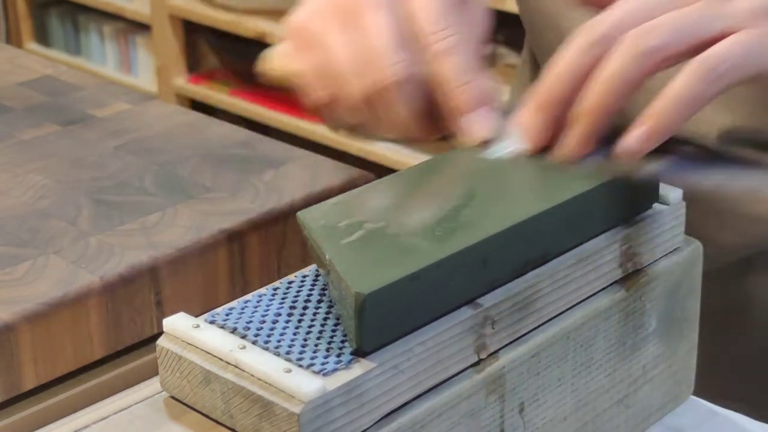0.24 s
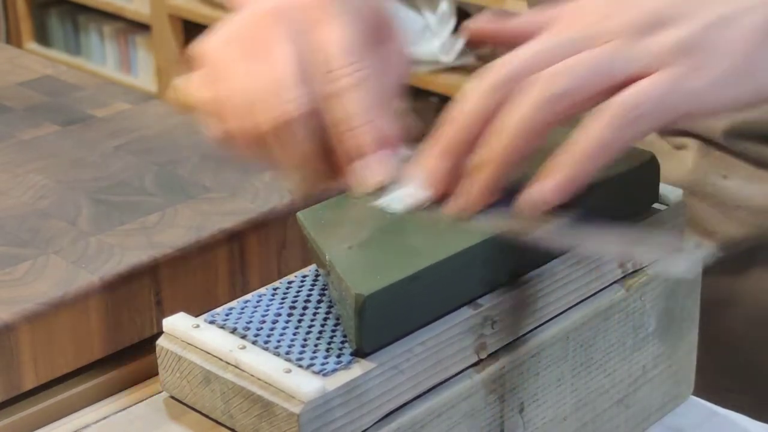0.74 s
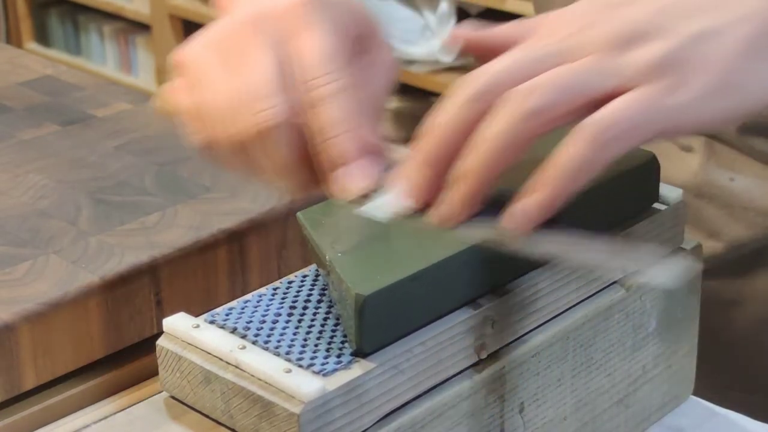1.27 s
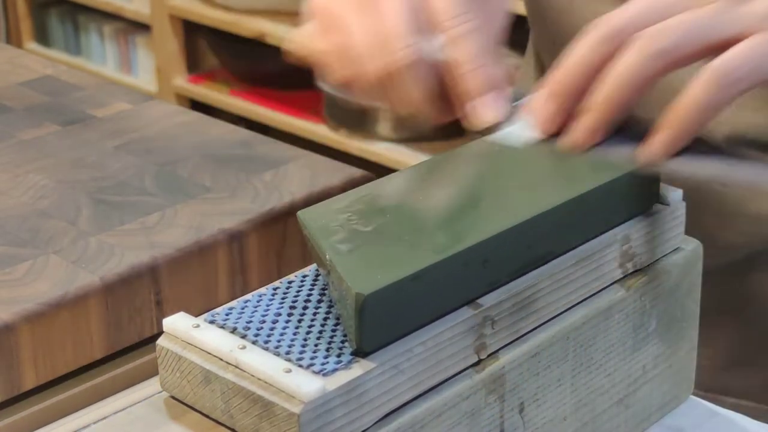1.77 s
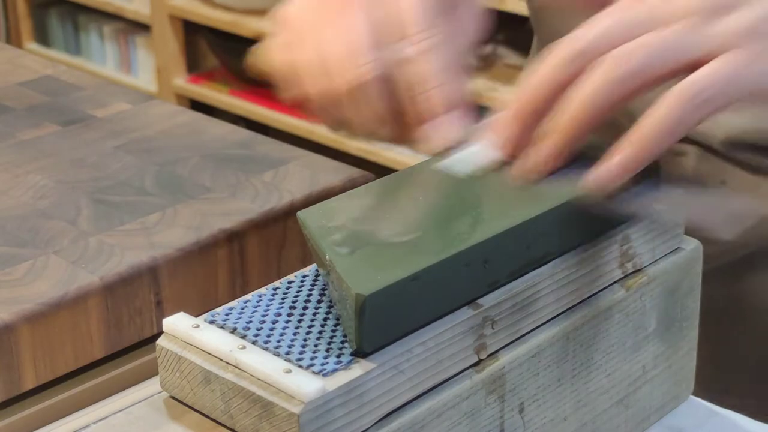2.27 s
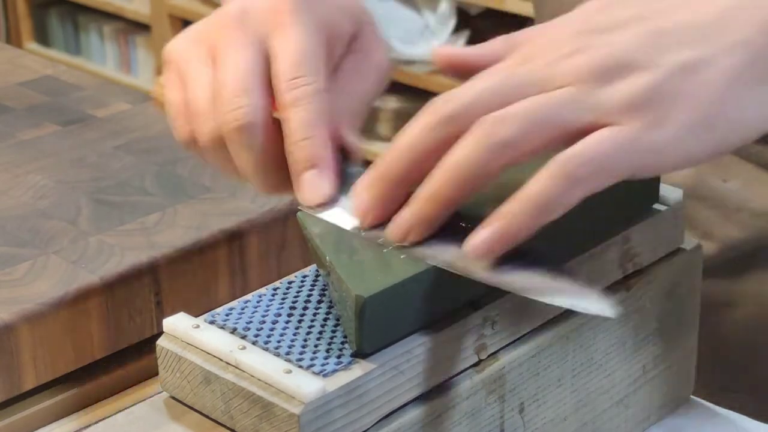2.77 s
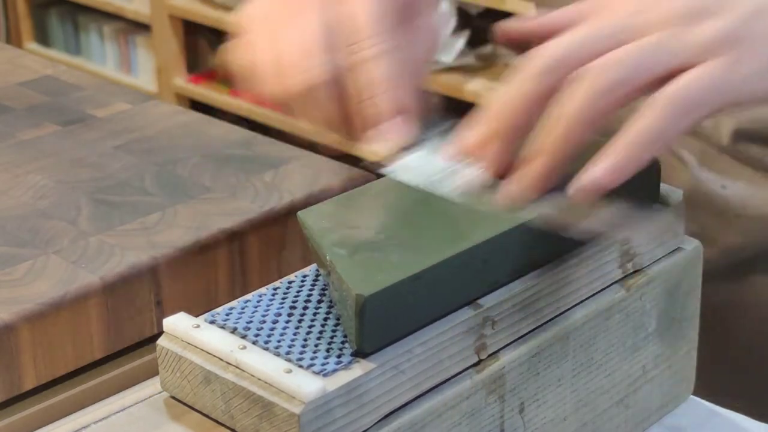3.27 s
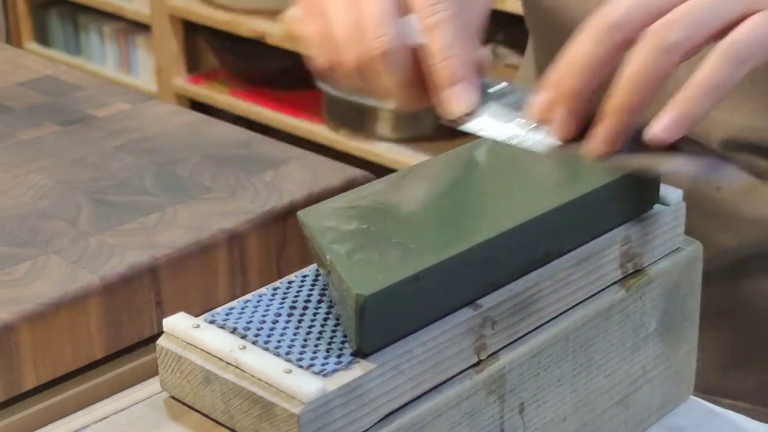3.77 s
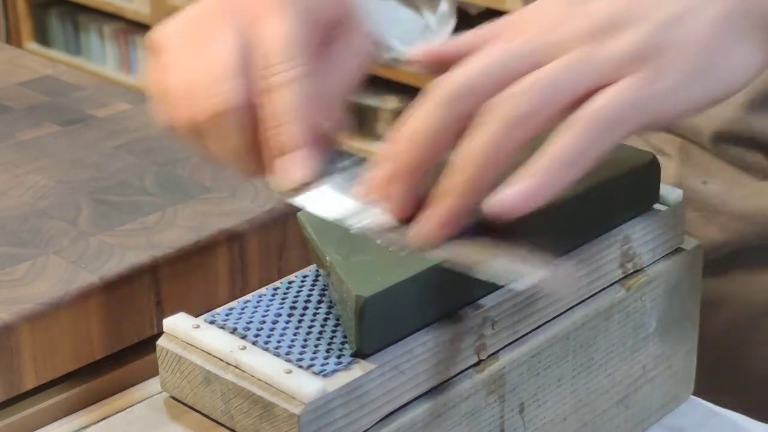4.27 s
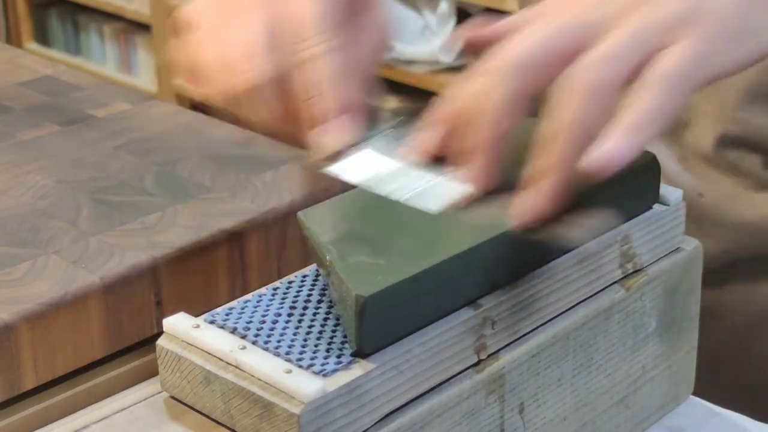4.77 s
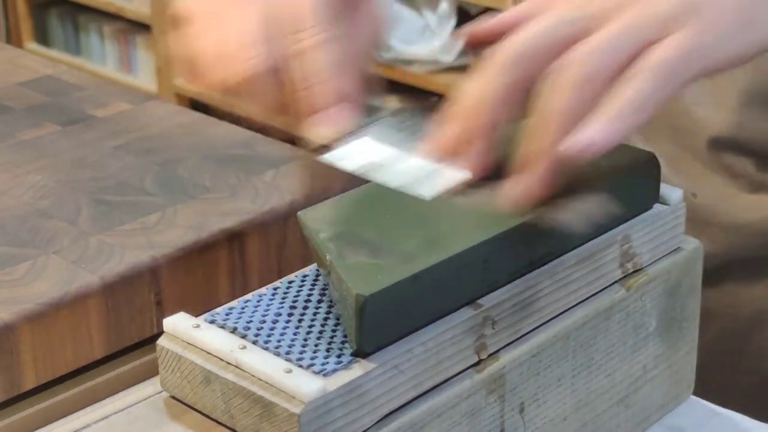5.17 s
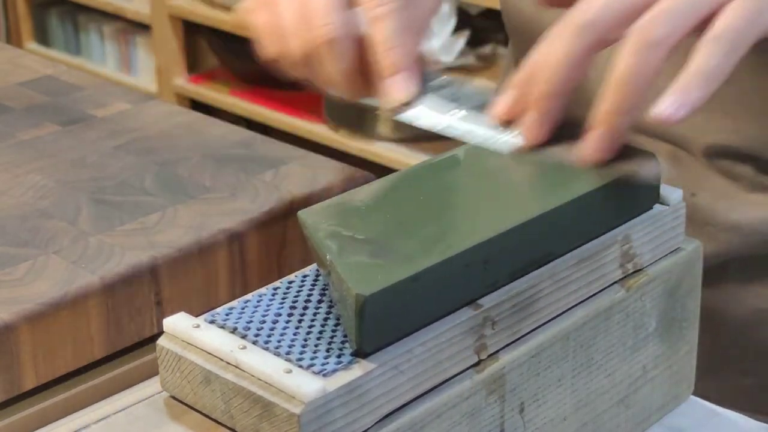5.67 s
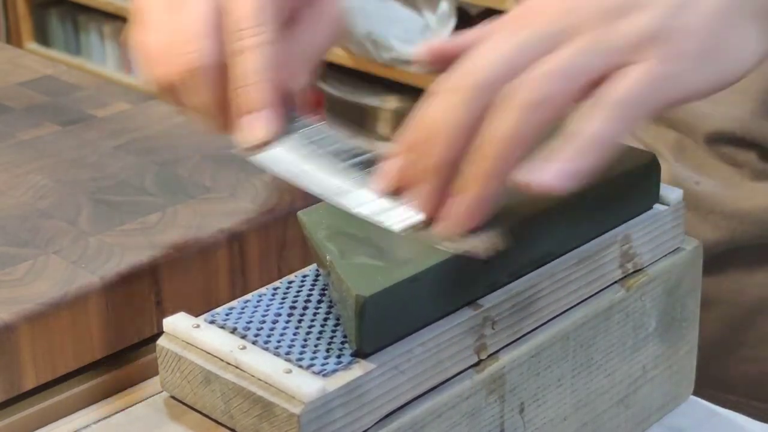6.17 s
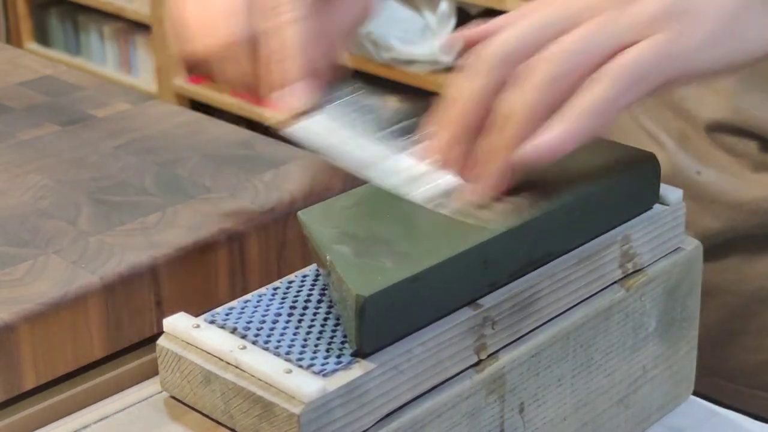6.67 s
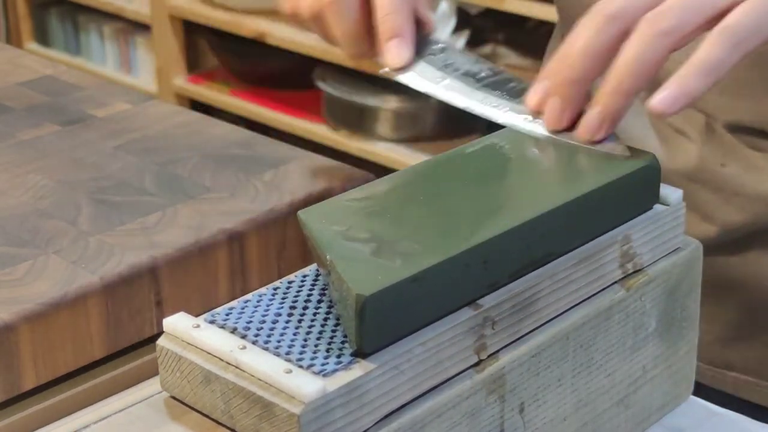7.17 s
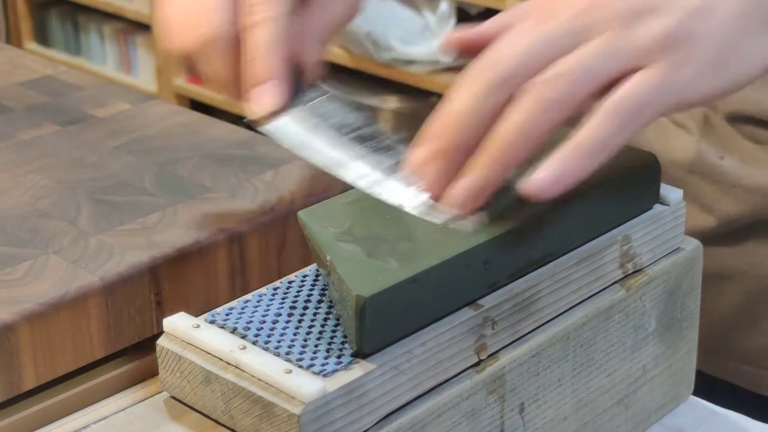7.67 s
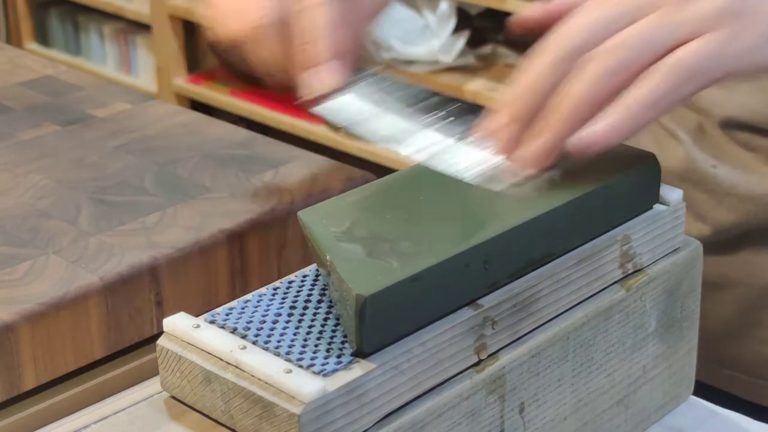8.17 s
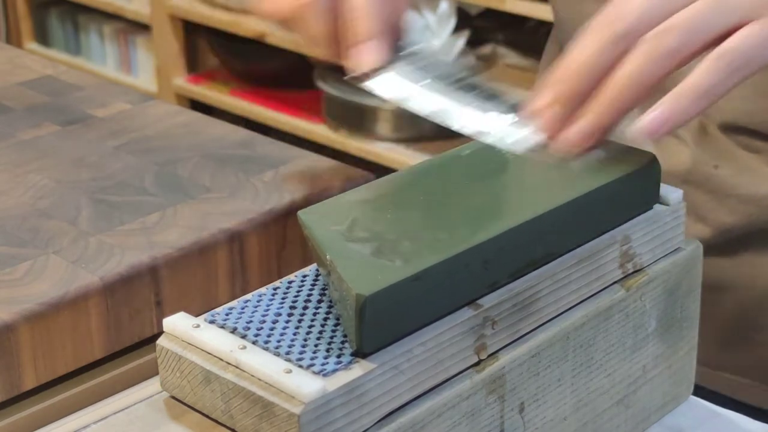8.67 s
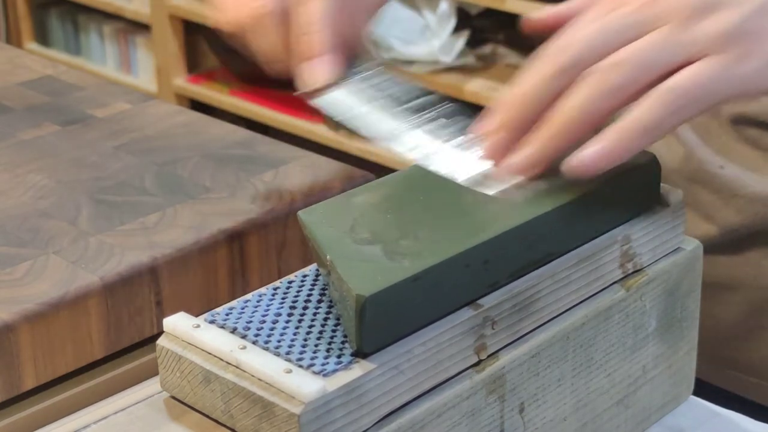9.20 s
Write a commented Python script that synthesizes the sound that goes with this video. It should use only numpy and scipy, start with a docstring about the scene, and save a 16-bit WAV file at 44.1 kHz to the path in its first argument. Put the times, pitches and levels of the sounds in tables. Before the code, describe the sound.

Close, rapid knife sharpening: gritty push and pull scrapes with a ringing steel tone, swelling early and thinning softer toward the end.

```python
"""A steel knife is pushed and pulled over a wet whetstone, close by in a quiet room.
The rasp is noise: grit scratches the edge, and each stroke shapes how loud it is. The scratches ring
the blade's resonances, which sway with each stroke and change as the fingers move from heel to tip.
Ticks mark where the edge breaks loose, and a few resonances sing out for a moment. Filtered noise gives
the faint rumble and thumps of the wooden stand, the room's short answer and its quiet background."""
import sys
import numpy as np
from scipy import signal
from scipy.fft import rfft, irfft, next_fast_len
from scipy.io import wavfile
from scipy.ndimage import uniform_filter1d, map_coordinates

SR = 44100
rng = np.random.default_rng(int(sys.argv[2]) if len(sys.argv) > 2 else 0)


def store_wav(level_fs):
    """Save 16-bit WAV to argv[1]."""
    pcm = np.round(np.clip(np.atleast_2d(level_fs), -1, 1) * 32767)
    wavfile.write(sys.argv[1], SR, pcm.T.astype(np.int16))


N = 416304
TIME = np.arange(N) / SR


def amp(db):
    """Turn decibels into a gain."""
    return 10 ** (np.asarray(db) / 20)


def unit(x):
    """Scale to an rms of 1."""
    return x / np.sqrt(np.mean(x ** 2) + 1e-20)


def ease(share):
    """Rise from 0 to 1 along a quarter of a sine, quick at first and gentle at the end."""
    return np.sin(np.pi / 2 * np.clip(share, 0, 1))


def along(points, hz):
    """Read a list of (Hz, value) points, with frequency on a log axis."""
    f, v = np.transpose(points)
    return np.interp(np.log(hz + 1), np.log(f + 1), v)


def wobble(rate, t):
    """A smooth random curve at times t, with rate random points a second."""
    points = rng.standard_normal(int(t[-1] * rate) + 4)
    return map_coordinates(points, [t * rate], mode="nearest")


def patches(shape):
    """A random field of rms 1, smooth over about 130 Hz and 70 ms."""
    field = uniform_filter1d(rng.standard_normal(shape), size=3, axis=-2)
    return unit(uniform_filter1d(field, size=12, axis=-1))


def filtered(x, response):
    """Filter x by a gain that depends on frequency."""
    m = next_fast_len(N + SR // 2)
    spectrum = rfft(x, m) * response(np.fft.rfftfreq(m, 1 / SR))
    return irfft(spectrum, m)[..., :N]


def pair(alike):
    """White noise at two microphone ports; alike is the share of its power that both receive."""
    alike = np.clip(alike, 0, 1)
    shared = np.sqrt(alike) * rng.standard_normal(N)
    return shared + np.sqrt(1 - alike) * rng.standard_normal((2, N))


def noise(spectrum, alike):
    """Coloured stereo noise of rms 1."""
    return unit(filtered(pair(alike), lambda hz: amp(along(spectrum, hz))))


def causal(db):
    """Responses that ring only after a blow, from gains laid out as (port, frequency, time)."""
    cepstrum = irfft(np.log(amp(db)), axis=1)
    half = cepstrum.shape[1] // 2
    # folding the second half onto the first gives the minimum-phase response
    cepstrum[:, 1:half] *= 2
    cepstrum[:, half + 1:] = 0
    return np.exp(rfft(cepstrum, axis=1))


# The strokes, push and pull in turn, a push first. Each row: start in seconds, relative level in dB,
# lean in dB (how much harder it ends than it begins), bite as a share of the stroke's level.
STROKES = [(-0.125, -41.5, 7.5, 0.0), (0.072, -38, -9.0, 0.17), (0.289, -41.5, 6.5, 0.031),
           (0.495, -39, 0.5, 0.0), (0.697, -41.5, 10.5, 0.18), (0.915, -39.5, -12, 0.0),
           (1.118, -41.5, 15, 0.72), (1.324, -34, 9, 0.11), (1.522, -33.5, 7.5, 0.67),
           (1.713, -29.5, -9.5, 0.0), (1.91, -35, 13.0, 0.28), (2.105, -31.5, -12.0, 0.28),
           (2.294, -34.5, 16.5, 0.28), (2.487, -30.5, -5.5, 0.0), (2.681, -35, 21, 0.61),
           (2.883, -31, 2, 0.41), (3.086, -33.5, -1.5, 0.41), (3.27, -31, 7, 0.24),
           (3.468, -35.5, -5.5, 0.19), (3.653, -30.5, 6, 0.14), (3.843, -34.5, -11, 0.0),
           (4.031, -31, 3.5, 0.0), (4.215, -34.5, 1.5, 0.16), (4.411, -31.5, -4.5, 0.27),
           (4.602, -34.5, -6, 0.17), (4.787, -31.5, -1.5, 0.0), (4.986, -37.0, -6, 0.11),
           (5.172, -32, 2.5, 0.11), (5.365, -37.0, 2, 0.3), (5.55, -32.5, -4.5, 0.0),
           (5.725, -38.5, 17.5, 0.0), (5.914, -33.5, 1, 0.0), (6.111, -38.0, 5, 0.77),
           (6.305, -34.0, 0, 0.0), (6.498, -39, -3, 0.36), (6.69, -31, 6.5, 0.1), (6.877, -37, 3.5, 0.29),
           (7.066, -32.0, -1.5, 0.073), (7.252, -39.5, -7, 0.0), (7.436, -36.5, -1, 0.81),
           (7.619, -42.0, -2.5, 0.28), (7.802, -34.5, 6.0, 0.43), (7.973, -41, 2.5, 0.0),
           (8.163, -36, 6, 0.16), (8.358, -41.5, -13, 0.5), (8.537, -35.0, 6.5, 0.0),
           (8.706, -43, -1, 0.048), (8.893, -41, 2.5, 0.6), (9.063, -44.5, -4.5, 0.54),
           (9.226, -39, 15, 0.23), (9.393, -42, 3, 0.21)]


def stroke_count(t):
    """Strokes done by time t, with fractions; the last one lasts as long as the one before."""
    starts = [row[0] for row in STROKES]
    turns = starts + [2 * starts[-1] - starts[-2]]
    return np.interp(t, turns, np.arange(len(turns)))


PUSH_RISE, PUSH_FALL = 0.55, 0.31  # shares of a push spent speeding up and slowing down
PULL_RISE, PULL_FALL = 0.52, 0.86  # the same for a pull
RISE_POWER, FALL_POWER = 0.62, 0.91  # how steeply the rasp follows each of the two
TURN_DB = -17  # rasp left at the turn, against the strokes around it
# after a turn the edge may stick, then break loose with a bite that fades
STICK_S, BITE_ATTACK_S, BITE_LIFE_S = 0.015, 0.002, 0.024
STUCK_DB = -4  # the rasp is held back while the edge still sticks


def effort():
    """Speed times pressure: each stroke speeds up, leans on its start or end, and slows into the turn."""
    start, level_db, lean_db, bite = np.transpose(STROKES)
    done = stroke_count(TIME)
    k = np.minimum(done.astype(int), len(STROKES) - 1)  # which stroke
    u = done - k  # how far through it, 0 to 1
    pull = k % 2 == 1
    rise = ease(u / np.where(pull, PULL_RISE, PUSH_RISE)) ** RISE_POWER
    fall = ease((1 - u) / np.where(pull, PULL_FALL, PUSH_FALL)) ** FALL_POWER
    slide = rise * fall * amp(lean_db[k] * (u - .5))

    loose = TIME - start[k] - STICK_S  # seconds since the edge broke loose
    free = ease(loose / BITE_ATTACK_S + .5)
    slide = slide * amp(STUCK_DB * (1 - free))
    breakaway = bite[k] * free * np.exp(-np.abs(loose) / BITE_LIFE_S)
    # a stroke that ends harder bites less
    breakaway = breakaway * np.minimum(amp(-lean_db[k] / 4), 1)

    # a little rasp is left even at the turns
    middles = np.arange(len(STROKES)) + .5
    creep = amp(TURN_DB + np.interp(done, middles, level_db))
    return np.hypot(amp(level_db[k]) * (slide + breakaway), creep)


# How unevenly the edge slides. Each row: time in seconds, depth of stick and slip (1 = usual).
UNSTEADY = [(0, .9), (1.8, 0.79), (4, 0.99), (6.2, 1.2), (6.8, 1.36), (8.2, 0.74), (9.44, 0.95)]


def grit(drive, rate, size_db, grain_db, chatter_db, judder_db, alike):
    """Countless fine scratches and single coarser grains, bunched by the stick and slip of the edge."""
    # about rate grains a second, more of them when the stroke works harder
    hit = rng.random(N) < rate / SR * np.sqrt(unit(drive))
    size = amp(size_db * np.minimum(rng.exponential(size=N), 3))
    grains = hit * size * pair(alike)
    depth = np.interp(TIME, *np.transpose(UNSTEADY))
    slips = amp(depth * (chatter_db * wobble(560, TIME) + judder_db * wobble(95, TIME)))
    scratches = pair(alike) + amp(grain_db) * unit(grains)
    return drive * unit(slips * scratches)


SWAY_LEAD_S = 0.017  # the tone peaks this long before the end of a push
SWAY_POWER = 1.7  # a higher power makes the peak of the sway sharper
# The blade's lowest bending tone as the fingers move from heel to tip.
# Each row: time in seconds, middle pitch in Hz, sway to scale the swing about it (a share of that pitch).
BENDING = [(0, 1010, 0.084), (1.1, 1060, 0.13), (1.48, 1180, 0.06), (1.58, 1323, 0.087), (2.7, 1336, 0.071),
           (3.2, 1420, 0.053), (3.6, 1435, 0.043), (4.74, 1450, 0.033), (4.83, 1910, 0.062),
           (5.5, 1810, 0.025), (6.05, 1520, 0.024), (6.4, 1397, 0.017), (7, 1388, 0.0052),
           (9.44, 1470, .005)]


def bending_tone(t):
    """Each push shortens the free length of the blade and raises its tone; each pull lowers it again."""
    s, hz, sway = np.transpose(BENDING)
    swing = np.abs(np.sin(np.pi / 2 * stroke_count(t + SWAY_LEAD_S)))
    travel = swing ** (2 * SWAY_POWER)
    return np.interp(t, s, hz) * (1 + 2 * np.interp(t, s, sway) * (travel - travel.mean()))


# Blade resonances and dips, one table for each part of the edge on the stone.
# Each row: centre in Hz, width in Hz, usual lift in dB (negative for a dip), share of the bending tone's
# glide it follows. The centres hold when the bending tone is at the first row's Hz.
HEEL = [(1067, 156, 26.5, 0.68), (1720, 190, 16, 0.36), (2234, 245, 19, 0.61), (2635, 68, 15, 0.31),
        (2850, 220, -7, 0.074), (3340, 770, 13, 0.52), (4060, 520, 7.5, 0.42), (4900, 850, 8.5, 0.3),
        (6800, 240, -10, 0), (8650, 310, 8, 0), (10600, 450, 3, 0.092)]
HEEL_PRESSED = [(1335, 146, 19, 1), (2697, 213, 14.5, 0.35), (3104, 480, 9.5, 0.89), (3650, 510, 1, 0.07),
                (4085, 130, 12, 0.31), (4920, 340, 12.5, 0.37), (6580, 290, -9, 0), (7880, 290, 4, 0.007),
                (8930, 160, 7, 0.023), (10840, 510, 5, 0.13)]
MIDDLE = [(1484, 116, 14, 0.11), (1914, 99, 9, 0.54), (2126, 240, 13.5, 1.3), (2520, 40, 10.5, 0),
          (2870, 230, -8, 0), (3620, 590, 12.5, 0.92), (4380, 260, 14.5, 0.87), (5130, 260, 9, 0.3),
          (6280, 140, 7.5, 0.11), (6800, 250, -7, 0), (8400, 840, 4, 0), (13500, 780, 6.5, 0.12)]
BELLY = [(1796, 205, 13.5, 0.73), (1500, 50, 9, 0.33), (2590, 530, 11, 0.11), (2700, 300, -4, 0),
         (3500, 400, 9, 0.4), (3650, 200, -8.5, 0.057), (4300, 460, 8.5, 0.16), (5170, 240, 12.5, 0.23),
         (6150, 340, 7.5, 0.0075), (8030, 420, 5.5, 0), (10200, 220, 8.5, 0.15), (14240, 1100, 9.5, 0.16)]
UPSWEEP = [(1440, 130, 14, 0.92), (2296, 270, 12, .6), (2850, 200, -1.5, 0), (3220, 240, 2.5, 0.48),
           (3840, 730, 10.5, 0), (4840, 570, 13, 0), (6000, 400, 2, 0.31), (8200, 570, 4.5, 0.017),
           (13200, 400, 5, 0), (15000, 600, 6, 0)]
NEAR_TIP = [(1470, 40, 16.5, 0.59), (1940, 52, 6, 0), (2318, 96, 15, 0.14), (2760, 260, -12, 0),
            (3230, 130, 10.5, 0.25), (3720, 220, 7, .3), (4260, 280, -10, 0.1), (5000, 280, 8.5, 0.1),
            (8400, 110, 6.5, 0.83), (8670, 990, 7.5, 0.31), (12050, 230, 14, 0.047),
            (13200, 220, -5, 0.081)]
TIP = [(1460, 48, 3.5, 1), (1928, 35, 13.5, 0.16), (2250, 260, 4.5, 0.0056), (3240, 430, 7, 0.095),
       (3840, 150, -2, 0), (3974, 116, 10, .3), (4470, 78, 2, 0), (4960, 450, 8.5, 0.96),
       (5670, 740, 5, 0.049), (8190, 410, 12, 0.26), (10000, 570, 5.5, 0), (11850, 260, 8, 0.31),
       (13500, 490, 10, 0)]
# Where the fingers press. Each row: middle of the change to this grip in seconds,
# brightness in dB per octave, table of resonances.
GRIPS = [(-.5, 4.1, HEEL), (1.52, 2, HEEL_PRESSED), (3.28, 2, MIDDLE), (4.78, 1.1, BELLY),
         (6.17, 3, UPSWEEP), (6.68, 1, NEAR_TIP), (7.25, 0, TIP)]
# Colour of the rasp at each microphone port. Each row: frequency in Hz, gain in dB.
LEFT = [(200, -32), (700.0, -17), (1200.0, -16.5), (2000.0, -14.5), (3200.0, -4), (4500.0, -7),
        (5800.0, -6), (6700.0, -3.5), (7500.0, 1.1), (8200.0, 6), (9000.0, 3.5), (9700.0, -1),
        (10500.0, -1), (12000.0, -4.5), (15400.0, -6)]
RIGHT = [(200, -51), (700.0, -29), (1200.0, -18.5), (2000.0, -14), (3200.0, -7), (4500.0, -8),
         (5600.0, -2.5), (6400.0, 0), (7300.0, -17.5), (8300.0, -23), (9100.0, -15), (9700.0, -9),
         (10500.0, -13.5), (12000.0, -11), (15400.0, -6.5)]
# How far the left port leads the right. Each row: frequency in Hz, usual phase in radians.
LEAD = [(1000, -0.96), (2000, 0), (2550, 1.1), (2900, 2.5), (3250, 1), (3700, 4), (4300, 7.5), (5200, 8.5),
        (6200, 7), (6800, 6), (8100, 10.5), (15000, 32.5)]


def blade(force, drive, wander, flicker_db, patchy_db, port_db, phase_scatter, speed_tilt_db, shift_time):
    """The scratches ring the steel, whose free length changes as it travels over the stone."""
    hz, t, z = signal.stft(force, SR, nperseg=1024, noverlap=768)
    f = hz[:, None]
    bending = bending_tone(t)
    octave = np.log2(np.maximum(f, 500) / 6000)  # octaves above 6 kHz, level below 500 Hz
    # one grip melts into the next
    reached = [np.clip((t - row[0]) / shift_time + .5, 0, 1) for row in GRIPS] + [0]
    colour = singing(f, t, width_hz=230, life=0.045)
    for k, (_, tilt_db, modes) in enumerate(GRIPS):
        share = reached[k] - reached[k + 1]
        held = share > 0
        lift = tilt_db * octave
        for centre, width, db, glide in modes:
            pitch = centre * (bending / modes[0][0]) ** glide * (1 + wander * wobble(14, t))
            height = db + flicker_db * wobble(15, t)
            lift = lift + height[held] / (1 + (2 * (f - pitch[held]) / width) ** 2)
        colour[:, held] += share[held] * lift
    # working harder than the half-second average is brighter
    surge = drive / uniform_filter1d(drive, SR // 2)
    colour += speed_tilt_db * octave * np.log(np.interp(t, TIME, surge))
    # the many weak resonances between the strong ones come and go with the contact
    colour += patchy_db * patches(colour.shape)
    # the flat of the blade radiates differently towards each port as it moves
    ports = np.array([along(LEFT, f), along(RIGHT, f)]) + port_db * patches(z.shape)
    response = causal(colour + ports)
    lead = along(LEAD, f) + phase_scatter * patches(colour.shape)
    response[0] *= np.exp(1j * lead)
    return signal.istft(z * response, SR, nperseg=1024, noverlap=768)[1][:, :N]


def room(x, t60, count):
    """A short diffuse answer of the bench and walls, which shifts as the hands move."""
    t = TIME[:SR // 3]
    answer = np.zeros_like(x)
    # several noise tails, whose shares of the sound drift smoothly
    weights = np.array([wobble(4, TIME[::100]) for _ in range(count)])
    for weight in weights / np.linalg.norm(weights, axis=0):
        tail = rng.standard_normal((2, len(t))) * amp(-60 * t / t60) * (t > .002)
        sent = x * np.interp(TIME, np.linspace(0, TIME[-1], len(weight)), weight)
        answer += signal.fftconvolve(sent, tail / np.linalg.norm(tail[0]), axes=1)[:, :N]
    return answer


# Resonances of the stone and its wooden stand. Each row: centre in Hz, width in Hz, relative level in dB.
STAND = [(116, 56, -5), (230, 37, -1), (374, 77, -10.5), (596, 47, -4), (1038, 26, -2)]


def stand(drive, level_db, swell_db):
    """The drag of the blade shakes the stone and the wood below, more at some moments than at others."""
    def wood(f):
        total = 0
        for k, (centre, width, db) in enumerate(STAND):
            damping = 1j * f * width
            # neighbouring resonances have opposite signs
            total = total + (-1) ** k * amp(db) * damping / (centre * centre - f * f + damping)
        return total

    shake = np.sqrt(drive) * amp(swell_db * wobble(3.6, TIME))
    return amp(level_db) * unit(filtered(shake * pair(alike=0.58), wood))


# Colours of the quiet background. Each row: frequency in Hz, relative level in dB.
ROOM_TONE = [(15, -16), (30, -1.5), (55, 0), (80, -0.5), (102, 0), (135, -2.5), (185, -8.5), (245, -6),
             (325, -12), (900, -20.5), (2000, -31)]
HISS = [(100, -12), (800, -10), (2000, -14.5), (6000, -18.5), (15000, -18)]


def background(tone_db, hiss_db):
    """Steady noise in two layers: a low room tone and a faint, wider hiss."""
    return amp(tone_db) * noise(ROOM_TONE, alike=0.25) + amp(hiss_db) * noise(HISS, alike=0.052)


# Colour of the stand's rocking. Each row: frequency in Hz, relative level in dB.
THUMP = [(30, -10), (110, 1), (250, -3), (500, -10), (1000, -25), (3000, -50)]


def rocking(level_db, width):
    """The stand takes a soft thump each time the stroke reverses; width is a share of the stroke."""
    done = stroke_count(TIME)
    from_turn = done - np.round(done)
    thump = np.exp(-(from_turn / width) ** 2) * amp(1.4 * wobble(8.2, TIME))
    return amp(level_db) * thump * noise(THUMP, alike=0.48)


TICK_DB = 1  # tick against the bite of its stroke
# The edge digs into coarse grit. Each row: time in seconds, starting level in dB before the blade rings.
SNAGS = [(1.75, -18), (3.105, -24), (6.749, -25)]


def catches(life):
    """Brief harsh ticks where the edge breaks loose after a turn or digs into a coarse grain."""
    ticks = [(s + STICK_S, bite * amp(db + TICK_DB)) for s, db, _, bite in STROKES if s > 0]
    snags = [(s, amp(db)) for s, db in SNAGS]
    push, age = np.zeros(N + SR), TIME[:SR // 20]
    for s, size in ticks + snags:
        push[round(s * SR):][:len(age)] += size * np.exp(-age / life)
    return push[:N] * pair(alike=0.18)


# For a moment the friction feeds one resonance and it sings out.
# Each row: time in seconds, frequency in Hz, lift in dB.
SINGS = [(2.138, 7450, 10), (2.46, 7500, 14), (3.21, 3720, 18), (3.55, 2000, 7), (4.35, 8100, 8),
         (4.46, 8100, 9.5), (4.52, 3810, 16.5), (4.64, 4320, 22), (4.86, 1990, 7.5), (4.91, 5200, 9),
         (5.05, 5300, 11.5), (5.28, 5070, 12), (6.77, 8100, 7), (8.12, 8900, 22), (8.63, 8420, 5.5)]


def singing(f, t, width_hz, life):
    """Brief narrow lifts in dB for the blade, laid out as (frequency, time)."""
    return sum(db * np.exp(-((t - s) / life) ** 2) / (1 + (2 * (f - hz) / width_hz) ** 2)
               for s, hz, db in SINGS)


def scene():
    """Add up the rasp, the room's answer, the stand and the background."""
    drive = effort()
    scratches = grit(drive, rate=2200, size_db=2.5, grain_db=-3.5,
                     chatter_db=0.76, judder_db=0.84, alike=0.76)
    force = amp(0.27) * scratches * amp(0.32 * wobble(35, TIME)) + catches(life=0.0013)
    rasp = blade(force, drive, wander=0.01, flicker_db=1.74, patchy_db=2.5, port_db=3.0,
                 phase_scatter=1.0, speed_tilt_db=2.82, shift_time=0.2)
    answer = amp(-8) * room(rasp, t60=0.2, count=6)
    wood = stand(drive, level_db=-74.5, swell_db=4.5) + rocking(level_db=-67.5, width=0.12)
    return rasp + answer + wood + background(tone_db=-64.5, hiss_db=-70.5)


TOP_HZ = 15550


def record(dry):
    """Band limit of the sound: nothing is kept from TOP_HZ upwards."""
    return filtered(dry, lambda hz: hz < TOP_HZ)


dry = scene()
out = record(dry)
store_wav(out)
```